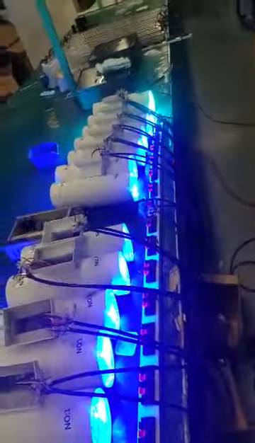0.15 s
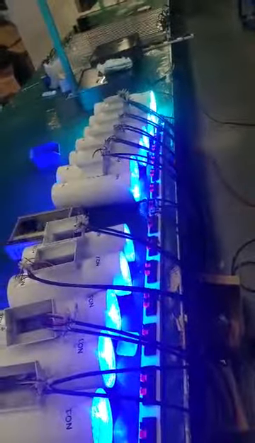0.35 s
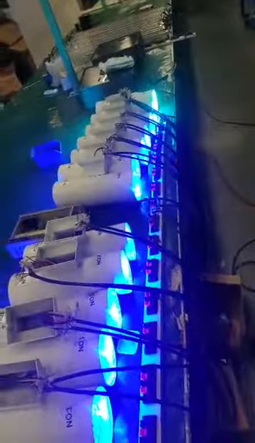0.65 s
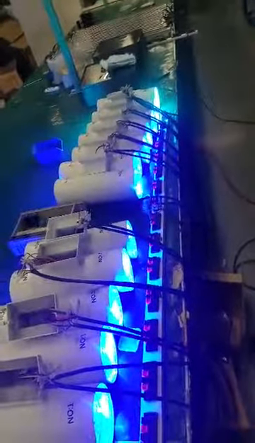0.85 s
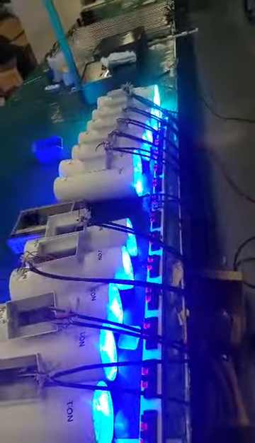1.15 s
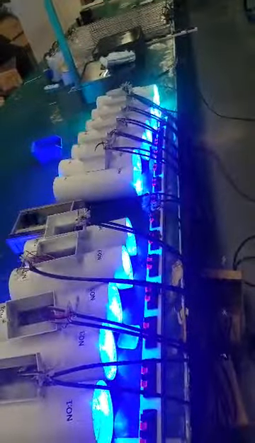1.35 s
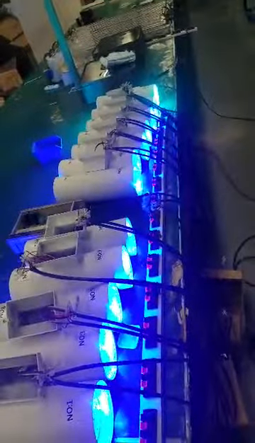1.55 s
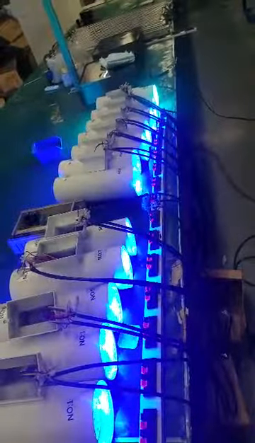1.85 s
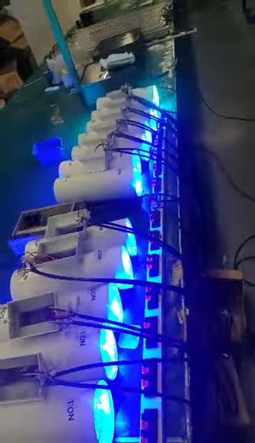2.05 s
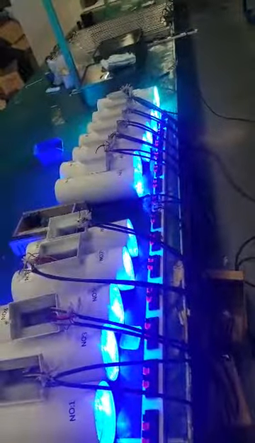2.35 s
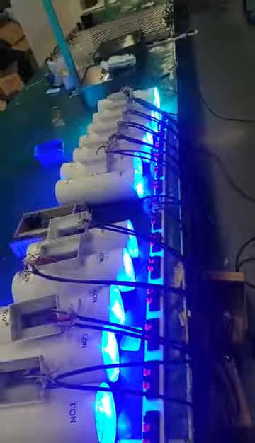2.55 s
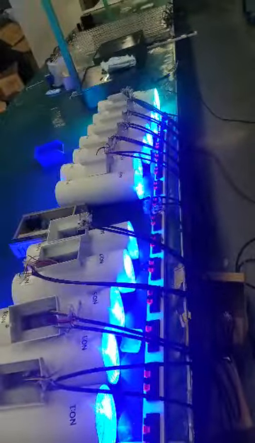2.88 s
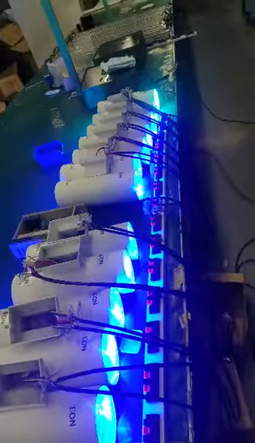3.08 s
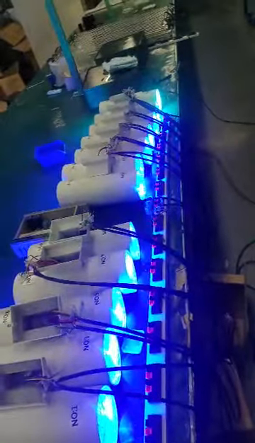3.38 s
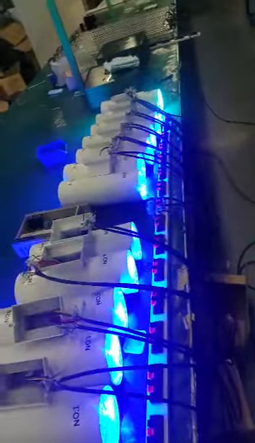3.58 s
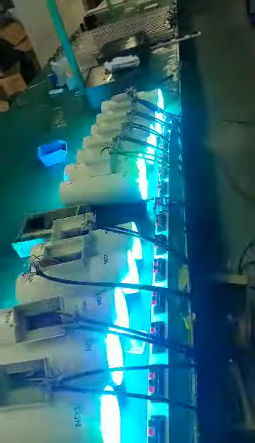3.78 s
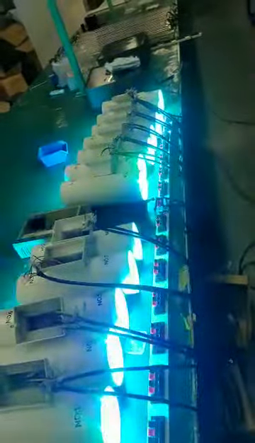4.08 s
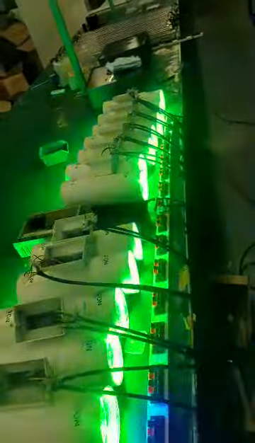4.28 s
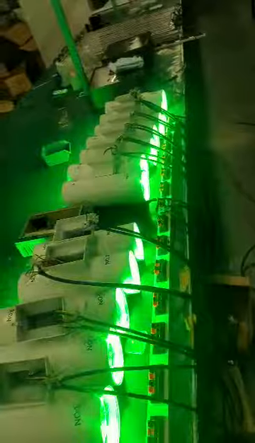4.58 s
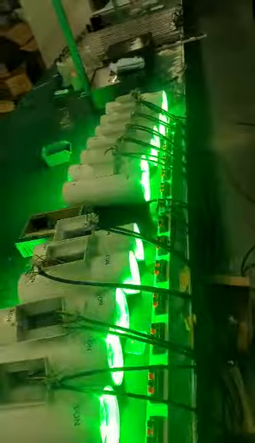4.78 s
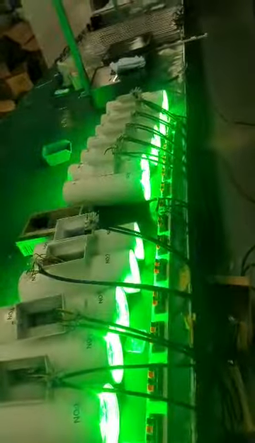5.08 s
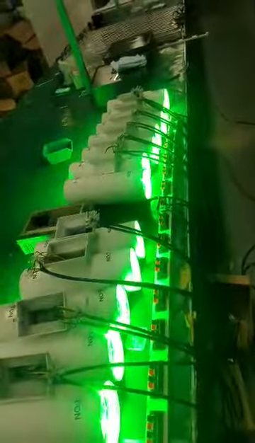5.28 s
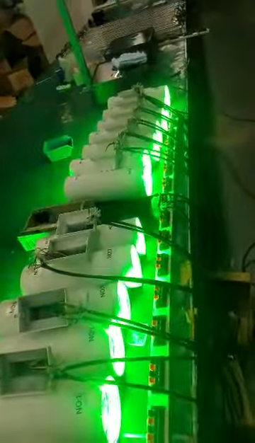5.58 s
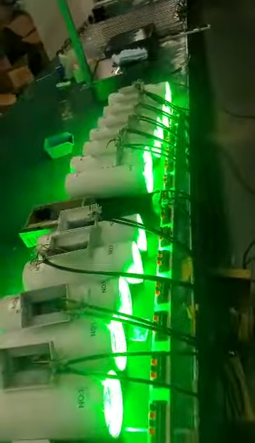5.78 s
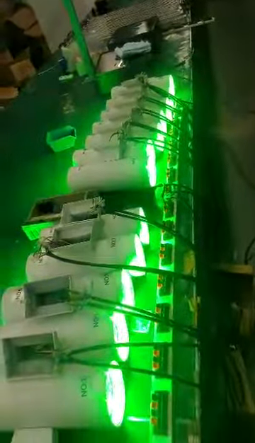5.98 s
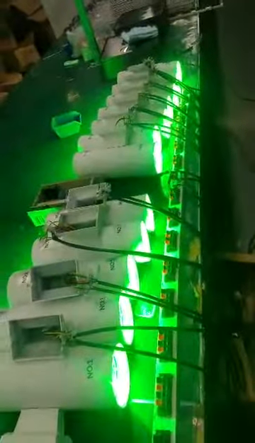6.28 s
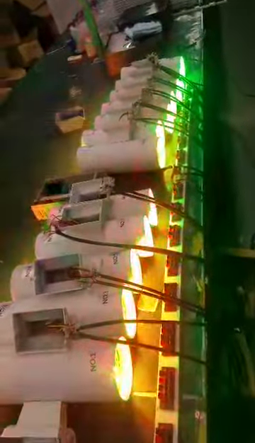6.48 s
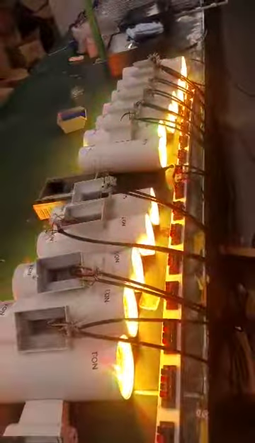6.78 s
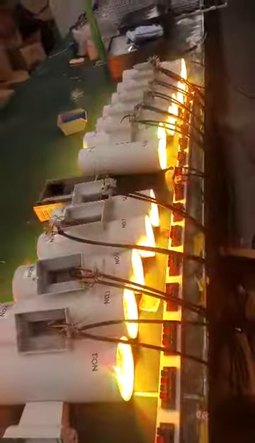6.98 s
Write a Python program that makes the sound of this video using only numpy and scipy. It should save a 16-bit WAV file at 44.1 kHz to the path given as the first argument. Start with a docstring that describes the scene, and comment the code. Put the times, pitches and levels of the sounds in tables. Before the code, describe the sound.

A small fast fan whines steadily throughout at one nearly fixed pitch, with a soft rush of air and low room rumble beneath. Close on the right, a plastic key is pressed and released three times, each press a sharp snap, each release a duller click. Faint low thuds come mid-way. Hand-held stereo microphones in a quiet indoor workshop turn slightly away at the end.

```python
"""In a quiet workshop a small nine-bladed cooling fan whines, heard by a hand-held pair of microphones.
Its blade and motor tones are sines at multiples of the shaft speed, over filtered noise for its air rush and
for a low room rumble with far hums. A plastic key on the right is pressed and released three times: noise cracks
and ringing modes, with a short room tail. Something far off thuds as slow-rising low sines.
The microphones sway a little and turn away at the end; their capsules add a faint hiss."""
import sys
import numpy as np
from scipy import signal
from scipy.fft import rfft, irfft, next_fast_len
from scipy.io import wavfile
from scipy.ndimage import uniform_filter1d, map_coordinates

SR = 44100
rng = np.random.default_rng(int(sys.argv[2]) if len(sys.argv) > 2 else 0)


def bounce(signal):
    """Save signal as a 16-bit WAV file at the path given by the first command-line argument."""
    frames = np.transpose(np.atleast_2d(signal))
    limited = np.clip(frames, -1, 1)
    pcm = np.round(limited * 32767).astype(np.int16)
    wavfile.write(sys.argv[1], SR, pcm)


N = 314874


def amp(db):
    """Amplitude factor of a level in dB."""
    return 10 ** (np.asarray(db) / 20)


def unit(x):
    """x scaled to an rms of one over all its channels."""
    return x / np.sqrt(np.mean(x ** 2) + 1e-20)


def along(points, hz):
    """Columns after the first, read on a log frequency axis."""
    f, *cols = np.transpose(points)
    return np.array([np.interp(np.log(hz + 1), np.log(f + 1), c) for c in cols])


def curves(rows):
    """One value per sample for each column after the time."""
    s, *cols = np.transpose(rows)
    return [np.interp(np.arange(N) / SR, s, c) for c in cols]


def wobble(rate):
    """A smooth random curve, rate knots a second."""
    knots = rng.standard_normal(int(N * rate / SR) + 4)
    return map_coordinates(knots, [np.arange(N) * rate / SR])


def filtered(x, response):
    """x shaped in frequency: response receives the spectra and frequencies and returns the shaped spectra."""
    m = next_fast_len(N + 8192)
    hz = np.fft.rfftfreq(m, 1 / SR)
    return irfft(response(rfft(x, m), hz), m)[..., :N]


def pair(z, alike):
    """Two unrelated spectra mixed to a left and right of the given likeness, -1 to 1."""
    angle = np.arccos(np.clip(alike, -1, 1)) / 2
    shared = np.cos(angle) * z[0]
    opposed = np.sin(angle) * z[1]
    return np.array([shared + opposed, shared - opposed])


def patchy(depth_db):
    """Two noises with shared time-frequency patches of random gain, together at unit rms."""
    z = signal.stft(rng.standard_normal((2, N)), nperseg=512)[2]
    field = rng.standard_normal(z.shape[1:])
    field = uniform_filter1d(field, size=5, axis=0)   # smooth over frequency
    field = uniform_filter1d(field, size=10, axis=1)  # smooth over time
    noise = signal.istft(z * amp(depth_db * unit(field)), nperseg=512)[1]
    return unit(noise[:, :N])


def pose():
    """How the microphones are held: the hand leans over and back, then turns away at an even pace."""
    # leans of the hand: middle t/s, half-length/s, size (0-1)
    leans = [(1.5, .2, .8), (3.548, 0.46, 1), (6.4, 0.45, 0.9)]
    turn_from_s, turn_to_s = 5.6, 6.9
    t = np.arange(N) / SR
    sway = sum(size * np.exp(-((t - s) / half) ** 2) for s, half, size in leans)
    turn = np.clip((t - turn_from_s) / (turn_to_s - turn_from_s), 0, 1)
    return sway, turn


def fan_tones():
    """All tones follow the shaft; the room's standing waves give each its own level and lead at each port."""
    # blade tone as the fan runs: t/s, f/Hz
    blade_tone = [(0, 855.2), (.45, 855.9), (.85, 854.55), (1.25, 855.8), (1.65, 855.35), (2.05, 855.6),
                  (2.65, 855.4), (3.65, 856.35), (4.1, 855.1), (4.45, 855.55), (4.9, 855.45),
                  (5.25, 856.05), (5.6, 855.6), (6.05, 855.2), (6.65, 855.3), (6.85, 854.6), (7.14, 854.3)]
    # tones as multiples of the shaft speed (9 blades, 4 motor poles): order
    orders = [2, 4, 9, 16, 18, 20, 24, 27, 36, 45, 54, 63, 72]
    # each order at the two ports: left level/dB, right level/dB, left lead/rad,
    # change at full sway of left level/dB, right level/dB,
    # change at full turn of left level/dB, right level/dB, left lead/rad
    port_tones = [(-76, -75, 0, 0, 0, 0, 0, 0), (-71, -76, 1.4, 0, 0, 0, 0, 0),
                  (-40, -41.4, -.35, -.2, -.3, 1.8, -3, .2), (-70, -67, 2, 0, 0, 0, 0, 0),
                  (-57, -56.5, 2.85, -3, -5, -6, 4, -1.1), (-65, -66, -2.2, 0, 0, 0, 0, 0),
                  (-80, -73, .4, 0, 0, 0, 0, 0), (-59, -61.5, .95, 2.2, -5, -.3, -1, -.3),
                  (-67.5, -72, 1.4, -.5, -11, -13, .5, 1.3), (-87, -76, -1.6, -4, 3, 13, -9, 1.1),
                  (-90, -83, 3.1, 0, 0, 4, 2.5, 0), (-99, -88, .9, 0, 0, 4, -6, 0),
                  (-99, -91, -2.1, 0, 0, 0, 0, 0)]
    blades = 9
    shaft = 2 * np.pi * np.cumsum(curves(blade_tone)[0]) / SR / blades
    shaft = shaft + .0012 * wobble(25)  # turbulence jostles the blades, rad
    sway, turn = pose()
    out = np.zeros((2, N))
    for k, row in zip(orders, port_tones):
        l_db, r_db, lead, l_sway, r_sway, l_turn, r_turn, lead_turn = row
        flutter_db = .02 * k * wobble(9)  # higher orders are less steady
        left_db = l_db + l_sway * sway + l_turn * turn + flutter_db
        right_db = r_db + r_sway * sway + r_turn * turn + flutter_db
        out[0] += amp(left_db) * np.cos(k * shaft)
        out[1] += amp(right_db) * np.cos(k * shaft - lead - lead_turn * turn)
    return np.sqrt(2) * out  # the levels are rms


def air():
    """Broad rush whose likeness at the two ports varies with frequency; wall echoes ripple its spectrum."""
    # rush before edges and echoes: f/Hz, left level/dB per Hz, right level/dB per Hz,
    # likeness (-1 to 1, clipped)
    rush_spectrum = [(160, -87.5, -89, .85), (310, -87.5, -85.5, 0.78), (492, -89, -87.5, 0.48),
                     (875, -76.5, -86.5, 0.91), (870, -75, -78.5, 0.29), (1168, -87.5, -82.5, 0.052),
                     (1328, -81, -80.5, 0.85), (1853, -91.5, -87.5, -0.08), (1887, -84.5, -80, 0.35),
                     (2395, -88, -93, 0.26), (2483, -84, -83.5, 0.8), (2760, -90.5, -94, 0.78),
                     (4700, -101, -94.5, 0.11), (6520, -112, -109, -1.04)]
    # echoes of the fan off the walls: delay t/s, level/dB
    wall_echoes = [(.0095, -24.5), (.0178, -15.5), (0.0048, -29.5)]
    right_delay_s = 5.5e-5  # the rush reaches the right port later

    def shape(z, hz):
        left_db, right_db, alike = along(rush_spectrum, hz)
        bass_edge = np.minimum(hz / 150, 1) ** 2
        treble_edge = 1 / np.maximum(hz / 6400, 1) ** 3
        echoes = 1 + sum(amp(db) * np.exp(-2j * np.pi * hz * delay) for delay, db in wall_echoes)
        lags = [np.ones(len(hz)), np.exp(-2j * np.pi * hz * right_delay_s)]
        ports = amp([left_db, right_db]) * lags
        return pair(z, alike) * ports * np.sqrt(SR / 2) * bass_edge * treble_edge * echoes

    turn = pose()[1]
    level_db = 0.26 * wobble(3.4) - 1.0 * turn  # softer when turned away
    return filtered(patchy(depth_db=0.72), shape) * amp(level_db)


def rumble():
    """Lumpy low noise and narrow noise bands for hums, nearly the same at both ports."""
    # shape of the low noise: f/Hz, relative level/dB per Hz
    low_spectrum = [(20, -1), (33, -8.5), (42, 3), (81, 2), (113, -1), (150, -6), (188, -5.5), (219, -24.5),
                    (260, -11), (340, -39), (570, -120)]
    # swell of the low noise: t/s, level/dB
    swell = [(0, -57), (.95, -55.5), (1.35, -56), (2.36, -59.5), (3.0, -56.5), (3.38, -52), (3.74, -55),
             (4.5, -53.5), (5.6, -60.5), (7.14, -59)]
    # far machines: f/Hz, half-power width/Hz, approximate level/dB before the swell
    far_hums = [(78.8, 4, -68.5), (117, 3.4, -75.5), (142.8, 2.2, -67), (187.8, 4.8, -77),
                (294.2, 3.3, -73)]
    hum_follows = .4  # share of the swell in dB that the hums take part in

    def low_shape(z, hz):
        return pair(z, 0.99) * amp(along(low_spectrum, hz))

    def hum_shape(z, hz):
        peaks = sum(amp(db) / np.sqrt(w) / np.hypot(1, (2 * (hz - c) / w) ** 2) for c, w, db in far_hums)
        return pair(z, 0.88) * peaks * np.sqrt(SR / 2)

    lumps = amp(0.98 * wobble(2.98)) * rng.standard_normal((2, N))
    low = unit(filtered(lumps, low_shape))
    hums = filtered(rng.standard_normal((2, N)), hum_shape)
    level_db, = curves(swell)
    hum_swell_db = hum_follows * (level_db - level_db.mean())
    both = amp(level_db) * low + amp(hum_swell_db) * hums
    return both * amp([[-.45], [.45]])  # a little stronger at the right port


def hiss():
    """Each capsule has its own faint noise; its patches of gain are shared."""
    # capsule noise ahead of the microphone response: f/Hz, left level/dB per Hz, right level/dB per Hz
    capsule_noise = [(3980, -116, -116), (6300, -111, -110), (7300, -110, -108), (15300, -109, -110)]
    return filtered(patchy(depth_db=2.5), lambda z, hz: z * amp(along(capsule_noise, hz)) * np.sqrt(SR / 2))


def ring(modes, t, attack):
    """Modes struck at t = 0, each at a slightly new strength, with a rise time constant attack in s."""
    t = np.maximum(t, 0)
    tones = 0
    for hz, db, t60 in modes:
        strength_db = db + rng.normal(0, 1)
        tones = tones + amp(strength_db - 60 * t / t60) * np.sin(2 * np.pi * hz * t)
    return tones * (1 - np.exp(-t / attack))


def key():
    """The spring snaps with a crack, then the key lands, rings case and desk and shakes the spring again."""
    # presses and releases in turn; presses snap hard, releases barely: t/s, snap level/dB, knock level/dB
    strokes = [(.6290, -31, -31.5), (1.1043, -46, -34), (3.1188, -31, -31.5), (4.6125, -50, -36),
               (5.9408, -33, -32), (6.9520, -48, -32.5)]
    # ringing modes, levels relative to the snap: f/Hz, level/dB, t60/s
    spring_modes = [(1640, -6, .022), (2030, -1, .022), (2400, -3, .022), (2760, -8, .018),
                    (4750, -15, .018), (7900, -18, .01), (13800, -11, .006)]
    # ringing modes, levels relative to the knock: f/Hz, level/dB, t60/s
    case_modes = [(740, -12, .05), (985, 0, .05), (1075, -2, .055), (1300, -15, .04)]
    # ringing modes, levels relative to the desk thump: f/Hz, level/dB, t60/s
    desk_modes = [(182, -1, .1), (545, 0, .09)]
    lands_s, desk_db = .0026, -39  # the key lands this long after the snap, always at the same desk level
    crack_db, crack_per_snap = -25, .5  # crack level = crack_db + crack_per_snap x snap level
    out, t = np.zeros(N + SR), np.arange(SR // 5) / SR
    landed = t - lands_s
    for s, snap_db, knock_db in strokes:
        crack_level_db = crack_db + crack_per_snap * snap_db
        crack = amp(crack_level_db - 60 * t / .014) * rng.standard_normal(len(t))  # t60 14 ms
        snap = ring(spring_modes, t, .0002) + amp(-5) * ring(spring_modes, landed, .0002)
        case = amp(knock_db) * ring(case_modes, landed, 0.0004)
        desk = amp(desk_db) * ring(desk_modes, landed, 0.0023)
        out[round(s * SR):][:len(t)] += crack + amp(snap_db) * snap + case + desk
    left_delay_s = .0005  # the left port hears the key later and weaker
    # left port against right: f/Hz, level/dB
    shadow = [(200, -1.5), (550, -3), (1000, -9), (2400, -5), (4700, -11), (14000, -13)]

    def shade(z, hz):
        return z * amp(along(shadow, hz)[0]) * np.exp(-2j * np.pi * hz * left_delay_s)

    return np.array([filtered(out[:N], shade), out[:N]])


def workshop(x):
    """A short noise tail, starting late, that dies fastest near 2 kHz and slowest in the bass."""
    decay = [(200, 0.32), (2000, 0.16), (10000, 0.24)]  # f/Hz, t60/s
    hz, t, z = signal.stft(rng.standard_normal((2, SR // 3)), SR, nperseg=256)
    fade_db = -60 * t / along(decay, hz).T
    tail = signal.istft(z * amp(fade_db), SR, nperseg=256)[1]
    tail = tail / np.linalg.norm(tail[0])
    delayed = np.pad(x, (400, 0))  # 400 samples, about 9 ms
    return signal.fftconvolve(delayed[None], tail, axes=1)[:, :N]


def thuds():
    """Soft low pushes through the floor: slow rise, short ring."""
    # far, dull pushes: t/s, level/dB before the rise and decay, f/Hz
    pushes = [(3.11, -40, 76.2), (3.34, -49, 52), (3.529, -39, 76), (4.0, -41, 77), (4.31, -42.5, 84),
              (4.51, -49, 80.4)]
    out, t = np.zeros(N + SR), np.arange(SR // 3) / SR
    rise = 1 - np.exp(-t / 0.014)
    for s, db, hz in pushes:
        decay = amp(db - 60 * t / 0.35)  # t60 0.35 s
        out[round(s * SR):][:len(t)] += decay * rise * np.sin(2 * np.pi * hz * t)
    return out[:N]


def scene():
    """Fan, rumble, key with its room tail and thuds, summed at the two ports."""
    clicks = key()
    room = amp(-12) * workshop(clicks[1])
    return fan_tones() + air() + rumble() + thuds() + clicks + room


def record(dry):
    """Capsule noise, a dip from the sound ports and nothing above the band limit."""
    # response of both microphones: f/Hz, level/dB
    port_response = [(8300, 0), (8900, -7), (9800, -5), (11500, -0.5), (14000, 0.5)]
    top_hz = 15720

    def response(z, hz):
        return z * amp(along(port_response, hz)[0]) * (hz < top_hz)

    return filtered(dry + hiss(), response)


dry = scene()
out = record(dry)
bounce(out)
```